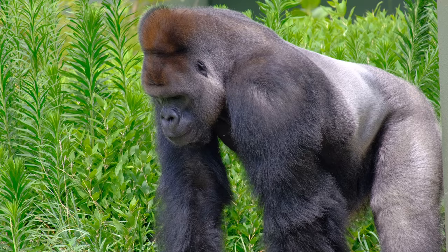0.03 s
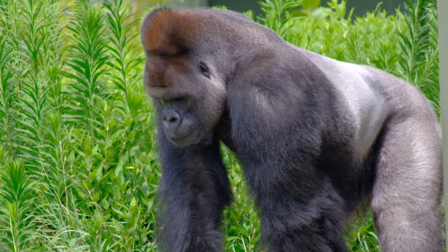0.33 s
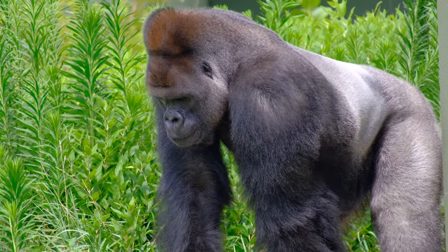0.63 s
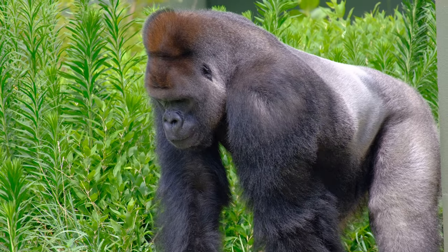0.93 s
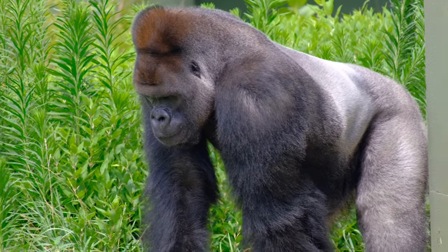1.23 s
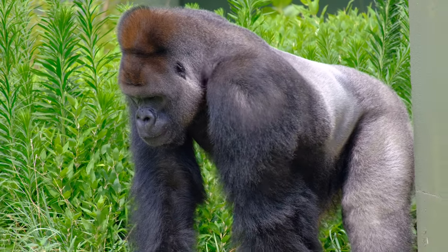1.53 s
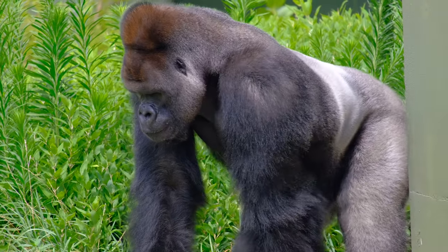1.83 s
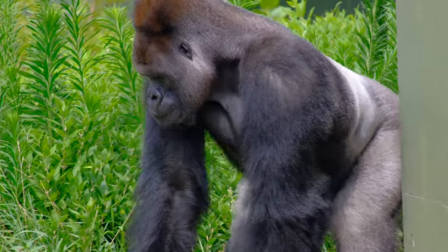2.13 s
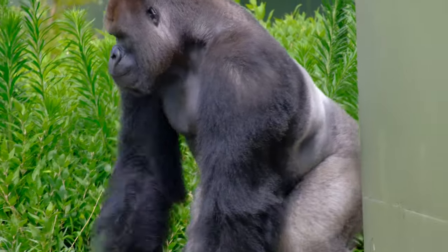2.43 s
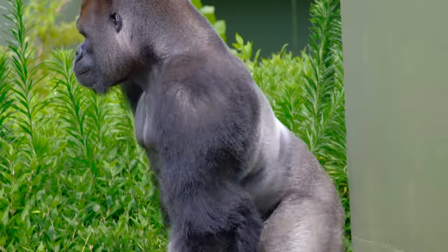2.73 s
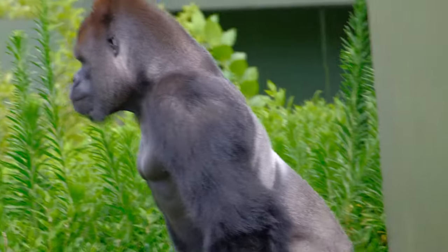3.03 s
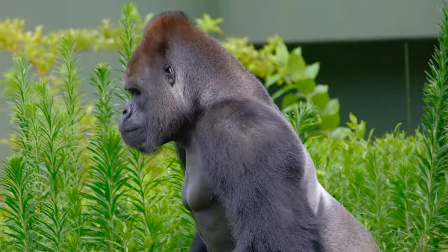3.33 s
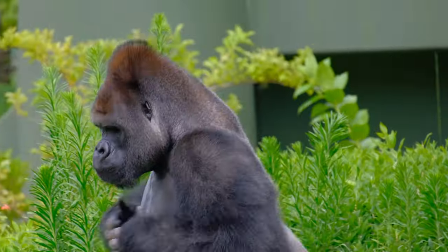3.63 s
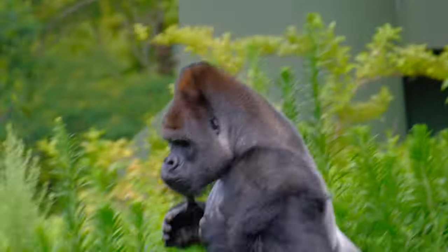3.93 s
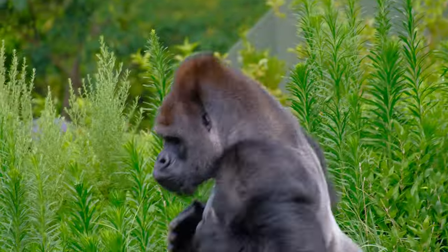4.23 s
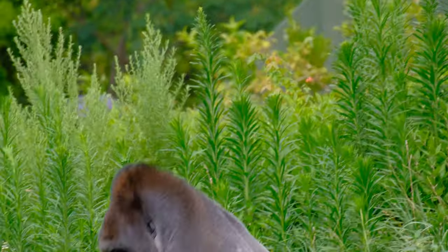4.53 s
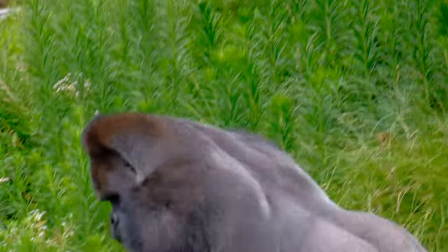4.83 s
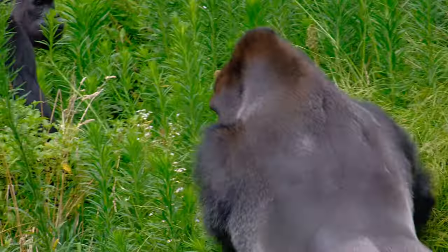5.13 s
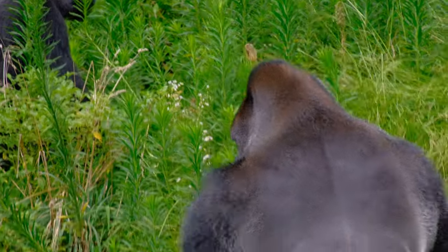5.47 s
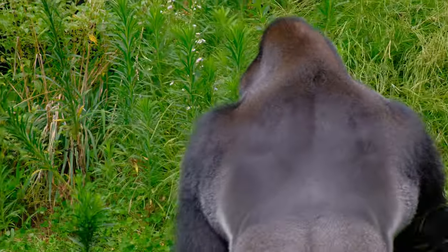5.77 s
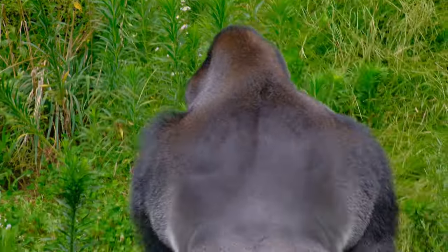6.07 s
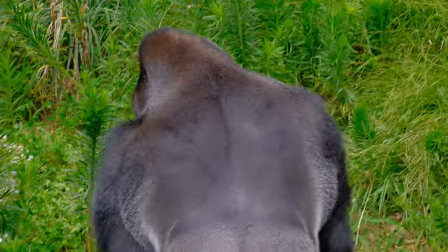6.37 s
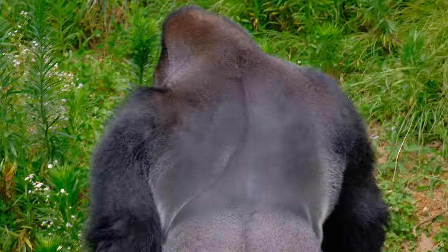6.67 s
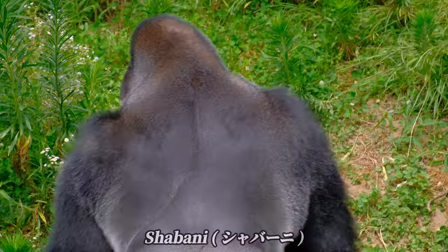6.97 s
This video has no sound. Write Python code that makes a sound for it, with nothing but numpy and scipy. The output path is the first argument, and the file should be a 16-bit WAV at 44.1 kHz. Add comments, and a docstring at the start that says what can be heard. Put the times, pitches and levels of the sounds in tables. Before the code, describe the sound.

Cicadas hiss steadily outdoors while an ape gives a few short, echoing hoots, then a gorilla drums its chest in quick, hollow pops.

```python
"""A gorilla drums its chest with cupped hands: hollow pops that bend upward as the trapped air shrinks.
Clear ape hoots echo off the walls of the grassy zoo enclosure beforehand; one more and faint far
calls follow. A chorus of cicadas hisses throughout, over a low wash of air and a thin machine whine.
The hand-held camera knocks softly, its lens motor whirrs, and stems brush and snap underfoot."""
import sys
import numpy as np
from scipy import signal
from scipy.fft import rfft, irfft
from scipy.io import wavfile
from scipy.ndimage import uniform_filter1d

SR = 44100
rng = np.random.default_rng(int(sys.argv[2]) if len(sys.argv) > 2 else 0)


def log_audio(samples):
    """Write samples as a 16-bit WAV file to the path given in sys.argv[1]."""
    # one column per channel
    frames = np.atleast_2d(samples).T
    # limit to full scale, then quantise
    limited = np.clip(frames, -1, 1)
    pcm = np.round(limited * 32767).astype(np.int16)
    wavfile.write(sys.argv[1], SR, pcm)


N = 313110
TIME = np.arange(N) / SR
PREROLL = SR // 4  # samples before zero, for an echo already in the air

# Table levels are relative; each layer sets its own gain.
# Tone colour of the massed cicadas: frequency_hz, level_db
CHORUS_SPECTRUM = [(1300, -35.5), (2000, -23), (2400, -16.5), (2800, -16.5), (3150, -13), (3700, -15),
                   (4500, -14.5), (5250, -17), (6300, -8), (7200, -7), (8050, 1.5), (8600, -2),
                   (10200, -21), (11500, -36)]
# Single cicadas holding a narrow note: start_s, length_s, pitch_hz, glide_hz_per_s, level_db
SOLO_CICADAS = [(-.5, 1.44, 5280, 139, -43.5), (0.205, 2.1, 6500, 17.5, -42),
                (1.895, 1.84, 6150, 149.5, -42), (3.6, 3.4, 6665, -39, -40), (3.698, 4.6, 5965, 60, -40),
                (5.6, 2.3, 5660, 79, -38.5)]
# Tone colour of the outdoor bed: frequency_hz, level_db
AIR_SPECTRUM = [(22, -46), (35, -36), (55, -30), (80, -4), (125, -6), (250, 0.5), (500, 0.5), (900, 2),
                (1400, -0.5), (2500, -7), (6000, -14), (12000, -22.5), (16000, -16.5)]
# Ape hoots: start_s, length_s, held_pitch_hz, final_rise_hz, end_level_db, swell_db
APE_HOOTS = [(-.13, .1, 850, 240, -19.5, 2), (1.781, 0.092, 678, 207, -29.5, 4.5),
             (2.452, .08, 759, 101, -27.5, 7.5), (2.852, .204, 965, 300, -17.5, 12.5),
             (3.111, 0.071, 877, 123, -19, 5), (3.243, 0.073, 863, -25, -23.5, 9),
             (7.006, 0.091, 690, 187, -29, 9.5)]
# Calls from across the zoo: start_s, length_s, held_pitch_hz, final_rise_hz, end_level_db, swell_db
DISTANT_CALLS = [(5.5, 0.12, 1000, -60, -51.5, 0), (6.06, .11, 1425, -10, -49, 9),
                 (6.27, 0.096, 1405, 15, -51, -1), (6.73, 0.098, 1103, 89, -47, -1)]
# Knocks on the camera body: start_s, level_db, relative_thud_db
HANDLING_KNOCKS = [(.92, -41.5, -12), (1.201, -41.5, 3), (2.274, -34.5, -1), (2.359, -31.5, -1.5),
                   (2.397, -33, -17), (2.702, -36, -2), (2.894, -32, -5.5), (3.955, -35, 2.5),
                   (4.456, -33, .5), (5.392, -35.5, 1.5), (5.763, -28.5, -19), (5.838, -30, -9),
                   (5.895, -28, -8), (5.963, -41, 5), (6.249, -34.5, 1), (6.791, -36, -14),
                   (6.969, -35.5, 3)]
# Ring of the camera shell: pitch_hz, level_db, t60_s
SHELL_MODES = [(267, -8.5, 0.065), (319, 2.5, 0.045), (437, -3, 0.024)]
# Thud of the camera in the hand: pitch_hz, level_db, t60_s
GRIP_MODES = [(106, -16, 0.13), (126, -8.5, 0.091)]
# Tones of the lens motor: pitch_hz, level_db
LENS_TONES = [(1430, -55), (1520, -53), (1610, -51), (1690, -52)]
# Runs of the lens motor: start_s, stop_s
LENS_RUNS = [(4.34, 4.485), (4.59, 4.984)]
# Brushes through the grass: start_s, length_s, level_db
GRASS_SCUFFS = [(1.188, 0.052, -55), (5.74, 0.13, -49), (6.623, .1, -44.5)]
# Tone colour of brushed grass: frequency_hz, level_db
GRASS_SPECTRUM = [(40, -40), (100, -24), (400, -6), (700, 2), (1500, -2), (3000, -3), (8000, -7),
                  (15000, -30)]
# Stems snapping underfoot: start_s, level_db
STEM_SNAPS = [(1.202, -36), (5.762, -36), (5.838, -34.5)]
# Tone colour of a skin slap or stem snap: frequency_hz, level_db
CRACK_SPECTRUM = [(200, -37), (700, -0.5), (1250, -8), (1550, -2.5), (1900, -2), (2350, -3.5),
                  (2800, -12.5), (4200, -16.5), (7000, -27), (15000, -46)]
# Hands landing on the chest: start_s, level_db, pocket_pitch_hz, bend_hz, ring_s, relative_slap_db
CHEST_BEATS = [(3.7467, -25, 472, 183, 0.024, -7), (3.8401, -16.5, 561, 307, 0.027, -17),
               (3.9145, -6.5, 623, 353, 0.017, -16.5), (4.0006, -7, 572.5, 308, 0.026, -9.5),
               (4.0618, -7.5, 555, 189, .017, 1), (4.1432, -7.5, 632, 230, 0.024, -5),
               (4.2087, -11, 530, 224, 0.0098, -7), (4.2865, -11, 561.5, 201, 0.016, -7)]
# Ring of the chest wall: pitch_hz, level_db, t60_s
CHEST_MODES = [(347, -8.5, 0.041), (427, -2, 0.015)]
# Slapback off hard surfaces: delay_s, level_db, lowpass_hz
WALL_BOUNCES = [(.0133, -10, 1800), (.0452, -6.5, 1400), (.0588, -8.5, 785)]
# Reverb time of the enclosure: frequency_hz, t60_s
ENCLOSURE_DECAY = [(100, 0.61), (300, 1.15), (600, 1), (1000, 1.64), (2000, 1.9), (5000, 0.8),
                   (12000, 0.21)]
# How alike left and right sound: frequency_hz, coherence_ratio
STEREO_COHERENCE = [(100, 1), (300, 1), (700, 0.78), (1500, 0.18), (3000, 0.59), (6000, 0.49), (8000, 0.58),
                    (11000, 0.68), (15000, 0.62)]
# Balance of the diffuse noise: frequency_hz, left_over_right_db
STEREO_BALANCE = [(150, 0.5), (380, -0.5), (700, -2), (1290, -3), (2380, -3.5), (4400, -3.5), (8120, -3.5),
                  (15000, 1)]
# Base phase lag between the microphone ports: frequency_hz, right_lag_rad
PORT_LAG = [(200, 0), (1100, .4), (3200, .6), (6000, 1.0), (6800, 1.2), (8200, .85), (10500, .5),
            (11500, 2.8)]


def amp(db):
    return 10 ** (np.asarray(db) / 20)


def unit_rms(x):
    return x / np.sqrt(np.mean(x ** 2) + 1e-20)


def curve(points, hz):
    """Breakpoints joined on a log-frequency axis."""
    frequency, value = np.transpose(points)
    return np.interp(np.log(hz + 1), np.log(frequency + 1), value)


def add(mix, start_s, sound):
    part = mix[max(round(start_s * SR), 0):][:len(sound)]
    part += sound[:len(part)]


def wander(size, rate_hz):
    """A smooth random modulator of rms about 1, rolling off above rate_hz."""
    rolloff = np.exp(-(np.fft.rfftfreq(N, 1 / SR) / rate_hz) ** 2)
    return unit_rms(irfft(rfft(rng.standard_normal(N)) * rolloff, N))[:size]


def diffuse(shape_db):
    """Coloured noise from all around, as two close microphone ports hear it."""
    hz = np.fft.rfftfreq(N, 1 / SR)
    left, other = rfft(rng.standard_normal((2, N)))
    shared = np.clip(curve(STEREO_COHERENCE, hz), 0, 1)
    pan = amp(curve(STEREO_BALANCE, hz) / 2)
    right = (shared * left + np.sqrt(1 - shared ** 2) * other) * np.exp(-1j * curve(PORT_LAG, hz))
    return unit_rms(irfft(np.array([left * pan, right / pan]) * amp(shape_db(hz)), N))


def band(centre_hz, width_hz):
    """Diffuse noise in one steep resonance."""
    return diffuse(lambda hz: -30 * np.log10(1 + ((hz - centre_hz) / width_hz) ** 2))


def low_cut(x, hz):
    return signal.sosfilt(signal.butter(5, hz, "high", fs=SR, output="sos"), x)


def dull(x, hz):
    return signal.lfilter(*signal.butter(1, hz, fs=SR), x)


def cicada_chorus(peak_s=1.9, swell_s=2.6, fade_s=0.87, blur_hz=130):
    """Massed tymbals blur into hiss; one broad voice swells and dies away, and a few hold notes."""
    out = diffuse(lambda hz: curve(CHORUS_SPECTRUM, hz)) * amp(-25.5 + 0.27 * wander(N, 120))
    out += band(7250, 790) * amp(-31.5) * np.exp(-((TIME - peak_s) / swell_s) ** 2)
    for start, length, hz, glide, db in SOLO_CICADAS:
        age = TIME - start
        phase = 2 * np.pi * np.cumsum(hz + glide * age) / SR + np.array([[0], [-1]])  # right lags
        swell = amp(db) * np.clip(np.minimum(age, length - age) / fade_s, 0, 1)
        buzz = wander(N, blur_hz) + 1j * wander(N, blur_hz)  # uneven tymbal clicks blur the note
        out += swell * (buzz * np.exp(1j * phase)).real * amp([[-1.5], [1.5]])
    return out


def seesaw_cicada(rock_hz=5.25, floor=0.28, growth_db_per_s=1.0):
    """One insect rocks between a low and a high syllable, growing steadily louder."""
    rock = np.cos(2 * np.pi * (rock_hz * TIME + 0.29 + 0.05 * wander(N, 5.3)))
    low = np.maximum(rock, floor) ** 0.81 * (band(3200, 650) + amp(-8) * band(2320, 450))
    high = np.maximum(-rock, floor) ** 0.89 * band(4590, 1140)
    crescendo = amp(-45.5 + growth_db_per_s * TIME + 1.8 * wander(N, 370))
    return (amp(1) * low + amp(1.5) * high) * crescendo


def air():
    """The low wash of the grounds, with a thin, steady machine whine."""
    wash = amp(-48 + 1.76 * wander(N, 6.4)) * diffuse(lambda hz: curve(AIR_SPECTRUM, hz))
    return wash + amp(-58) * band(1815, 18)


def ape_voice(calls, octave_db, scoop=0.0783, scoop_s=0.0201, attack_s=0.021, release_s=0.017):
    """Near-pure calls scoop onto a note and bend at the end; their octave grows with the effort."""
    tone, octave = np.zeros((2, N + PREROLL))
    for start, length, hz, rise_hz, db, swell_db in calls:
        t = np.arange(0, length, 1 / SR)
        final_sweep = rise_hz / (1 + np.exp((length - 0.03 - t) / (0.11 * length)))
        pitch = hz * (1 - scoop * np.exp(-t / scoop_s)) + final_sweep
        phase = 2 * np.pi * np.cumsum(pitch * (1 + 0.009 * wander(len(t), 71))) / SR
        gate = np.minimum(t / attack_s, 1) * np.minimum((length - t) / release_s, 1)
        effort = gate * amp(db - swell_db * (1 - t / length) + 1.98 * wander(len(t), 53))
        add(tone, start + PREROLL / SR, effort * unit_rms(np.sin(phase)))
        add(octave, start + PREROLL / SR, effort ** 1.34 * amp(octave_db) * unit_rms(np.sin(2 * phase)))
    return tone, octave


def hoots(entry_s=0.0384):
    """Hoots thrown back by the walls, their octave mostly as echo, and far calls behind them."""
    tone, octave = ape_voice(APE_HOOTS, octave_db=-9)
    far, _ = ape_voice(DISTANT_CALLS, octave_db=-10)
    voice = tone + amp(-5) * octave
    near = amp(2) * (voice + slapback(voice)) * amp([[-4], [2.5]])
    echo = amp(-4) * reverb(tone + octave, gap_s=0.0072, build_s=0.0039) * amp([[-2.5], [2]])
    distant = amp(-2) * far + amp(-3) * reverb(far, gap_s=0.0081, build_s=0.016)
    entry = np.clip((TIME - entry_s) / 0.0073, 0, 1)  # the hoot layer is gated in abruptly just after the start
    return entry * off_axis((near + echo + distant)[:, PREROLL:], spread=2.34)


def slapback(x):
    """Distinct, dulled repeats from the nearest hard surfaces."""
    out = np.zeros(len(x))
    for delay, db, lowpass_hz in WALL_BOUNCES:
        add(out, delay, amp(db) * dull(x, lowpass_hz))
    return out


def reverb(x, gap_s, build_s, taps_per_s=2500, frame=256):
    """The enclosure's tail: sparse reflections build after a gap and die band by band."""
    shape = (2, SR * 3 // 2)
    taps = rng.standard_normal(shape) * (rng.random(shape) < taps_per_s / SR)
    hz, t, bands = signal.stft(taps, SR, nperseg=frame)
    shared = np.clip(curve(STEREO_COHERENCE, hz), 0, 1)[:, None]
    bands[1] = shared * bands[0] + np.sqrt(1 - shared ** 2) * bands[1]
    bands *= amp(-60 * t / curve(ENCLOSURE_DECAY, hz)[:, None]) * np.clip((t - gap_s) / build_s, 0, 1)
    bands /= np.sqrt(np.mean(np.sum(abs(bands[:, 2:8]) ** 2, axis=2)))  # normalise on the mids
    tail = signal.istft(bands, SR, nperseg=frame)[1] / np.sqrt(frame ** 2 / 3)
    return signal.fftconvolve(x[None], tail, axes=1)[:, :len(x)]


def off_axis(x, spread):
    """Sound from one side reaches the second microphone port a little later."""
    lag = spread * curve(PORT_LAG, np.fft.rfftfreq(N, 1 / SR))
    return np.array([x[0], irfft(rfft(x[1]) * np.exp(-1j * lag), N)])


def ring(modes, t):
    """Damped modes after one blow."""
    return sum(amp(db - 60 * t / t60) * np.sin(2 * np.pi * hz * t) for hz, db, t60 in modes)


def camera_knocks(detune=0.04, attack_s=0.0031):
    """Handling rings the shell, at a slightly new pitch each time, over a thud in the grip."""
    t, out = TIME[:SR // 6], np.zeros(N)
    for start, db, thud_db in HANDLING_KNOCKS:
        shell = ring(SHELL_MODES, t * (1 + detune * rng.standard_normal()))
        thud = amp(thud_db) * ring(GRIP_MODES, t)
        add(out, start, 1.79 * amp(db) * (shell + thud) * (1 - np.exp(-t / attack_s)))
    return out


def grass():
    """Stems brush, crackle and snap underfoot."""
    touch, snaps = np.zeros((2, N))
    for start, length, db in GRASS_SCUFFS:
        add(touch, start, amp(db) * signal.windows.hann(int(length * SR)))
    for start, db in STEM_SNAPS:
        add(snaps, start, amp(db) * crack(TIME[:SR // 6], decay_s=0.0011))
    return snaps + touch * diffuse(lambda hz: curve(GRASS_SPECTRUM, hz)) * amp(4 * wander(N, 120))


def crack(t, decay_s):
    """A short burst of contact noise."""
    colour = amp(curve(CRACK_SPECTRUM, np.fft.rfftfreq(len(t), 1 / SR)))
    noise = irfft(rfft(rng.standard_normal(len(t))) * colour, len(t))
    return unit_rms(noise) * t / decay_s * np.exp(1 - t / decay_s)


def chest_beats(scoop=0.36, scoop_s=0.0019, bend_s=0.0234, attack_s=0.00051):
    """A cupped hand traps air on the chest; the pocket shrinks, so its pitch rises as it rings."""
    t, pops = TIME[:SR // 6], np.zeros(N)
    for start, db, hz, bend_hz, ring_s, slap_db in CHEST_BEATS:
        pitch = hz * (1 - scoop * np.exp(-t / scoop_s)) + bend_hz * np.minimum((t / bend_s) ** 3, 1)
        pocket = np.sin(2 * np.pi * np.cumsum(pitch) / SR) * np.exp(-(t / ring_s) ** 2.47)
        add(pops, start, amp(db) * (pocket + ring(CHEST_MODES, t)) * (1 - np.exp(-t / attack_s)))
        slap = 0.5 * amp(db + slap_db) * crack(t, decay_s=0.0028)
        add(pops, start - 0.00203, slap)  # the fingers land before the palm seals
    pops = low_cut(pops, hz=290)  # so small a pocket radiates no bass
    add(pops, 0.00505, amp(-10) * pops)  # the ground bounce thickens each pop
    near = (pops + slapback(pops)) * amp([[0.3], [-0.3]])
    return near + amp(-8) * reverb(dull(pops, hz=1740), gap_s=0.01, build_s=0.013)


def lens_motor(blur_hz=26):
    """The lens motor whirrs through the camera body: a cluster of rough, close tones."""
    gate = sum(1.0 * ((TIME > start) & (TIME < stop)) for start, stop in LENS_RUNS)
    whirr = np.zeros(N)
    for hz, db in LENS_TONES:
        roughness = wander(N, blur_hz) + 1j * wander(N, blur_hz)
        whirr += amp(db) * (roughness * np.exp(2j * np.pi * hz * TIME)).real
    return whirr * uniform_filter1d(gate, size=600)


def scene():
    """Gorilla up front, hoots and ambience around it, camera noises dead centre."""
    outdoors = chest_beats() + hoots() + cicada_chorus() + seesaw_cicada() + air()
    camera = low_cut(camera_knocks() + lens_motor(), hz=76)
    return outdoors + camera + grass()


def record(dry, edge_hz=15800):
    """Peaks stop at full scale, then a steep low-pass trims the top."""
    lowpass = signal.firwin(511, edge_hz, window=("kaiser", 9), fs=SR)
    return signal.oaconvolve(np.clip(dry, -1, 1), lowpass[None], "same")


dry = scene()
out = record(dry)
log_audio(out)
```